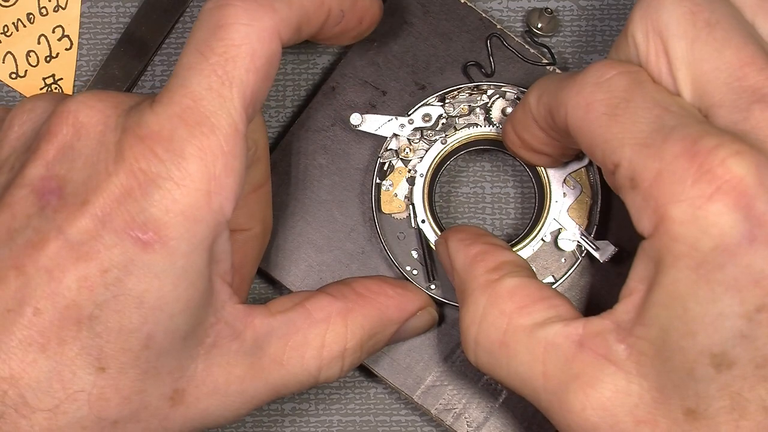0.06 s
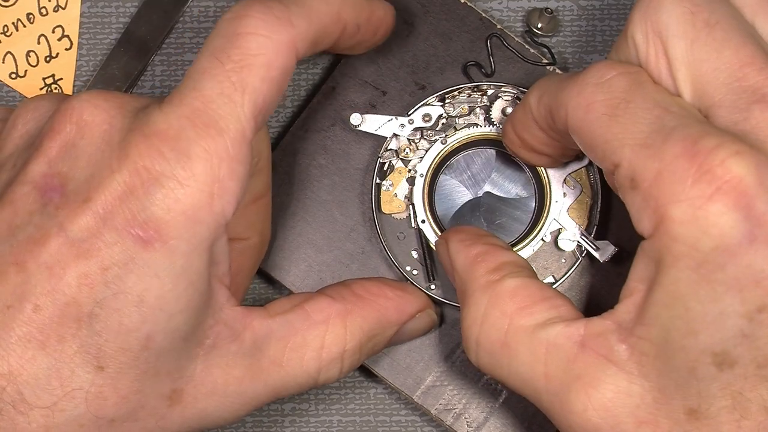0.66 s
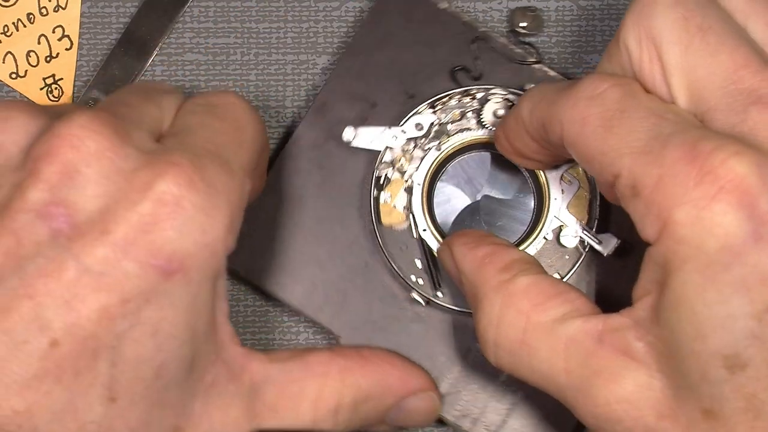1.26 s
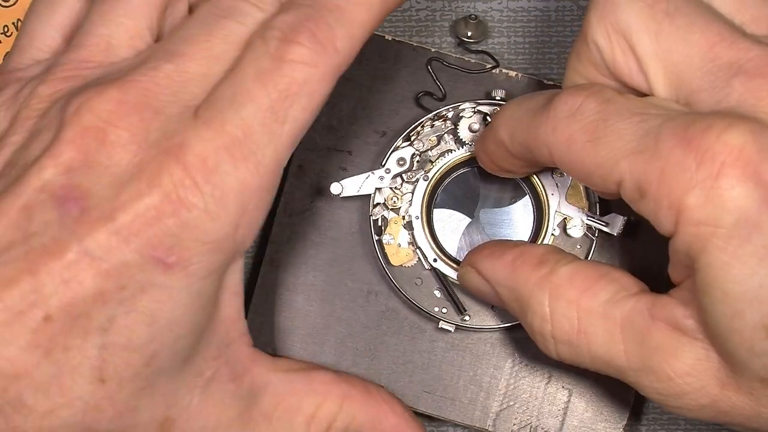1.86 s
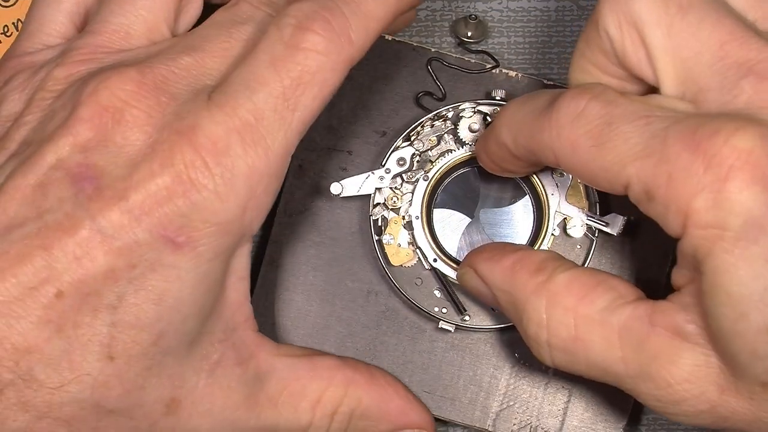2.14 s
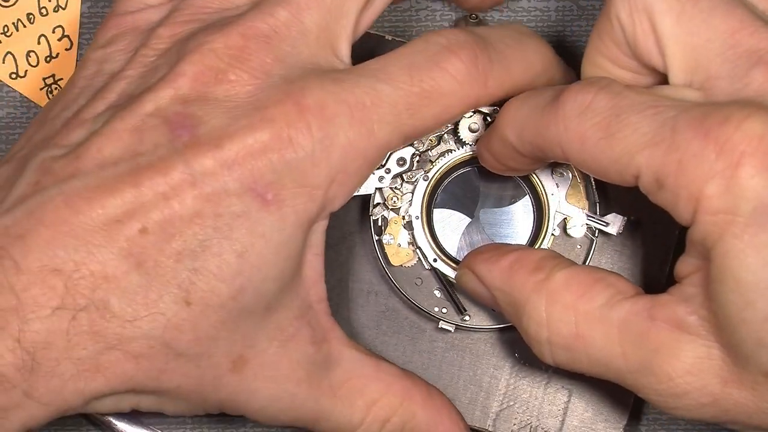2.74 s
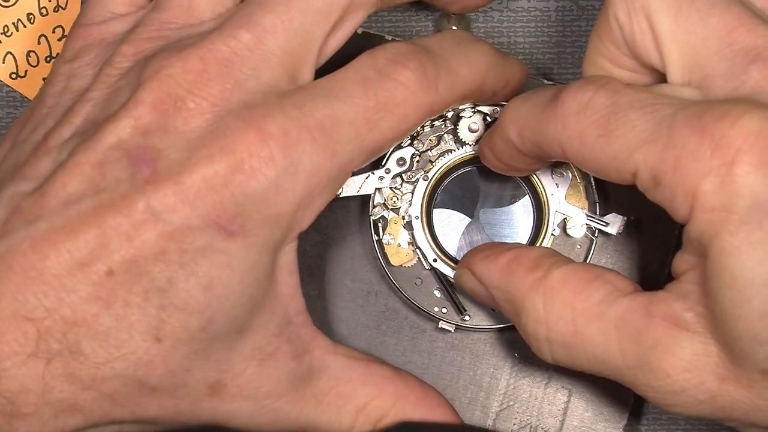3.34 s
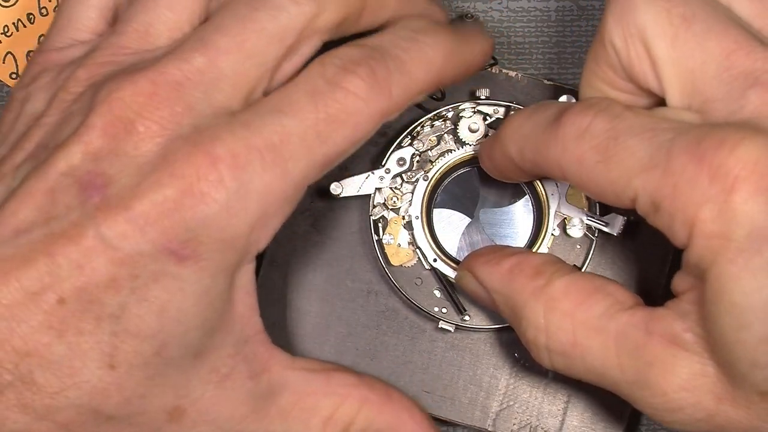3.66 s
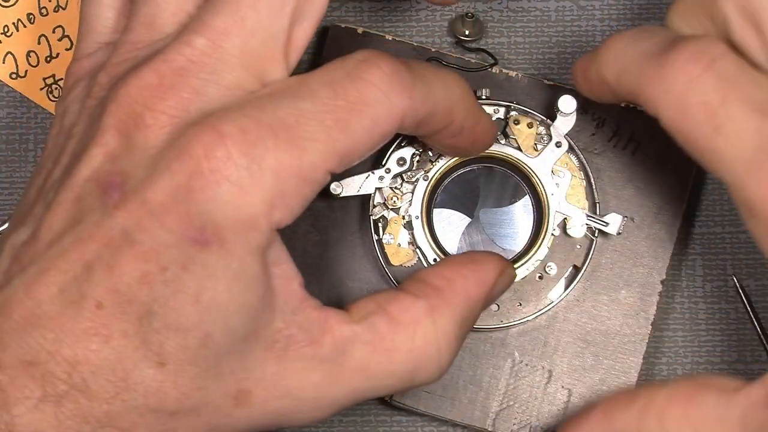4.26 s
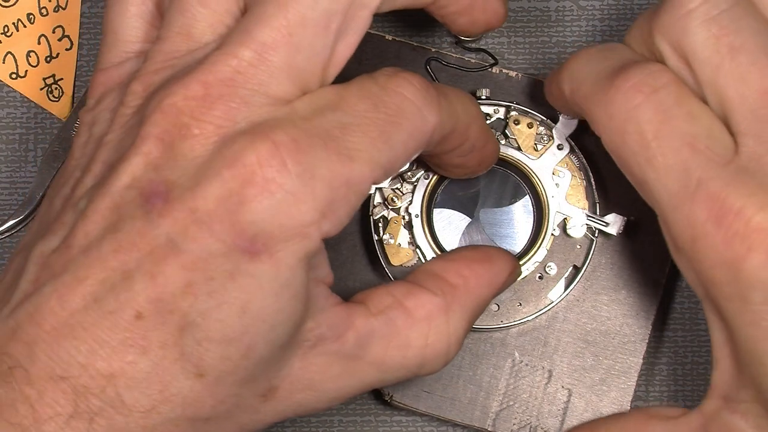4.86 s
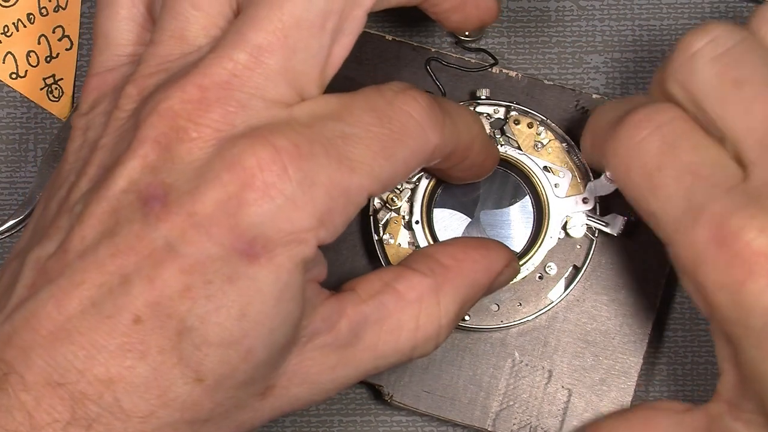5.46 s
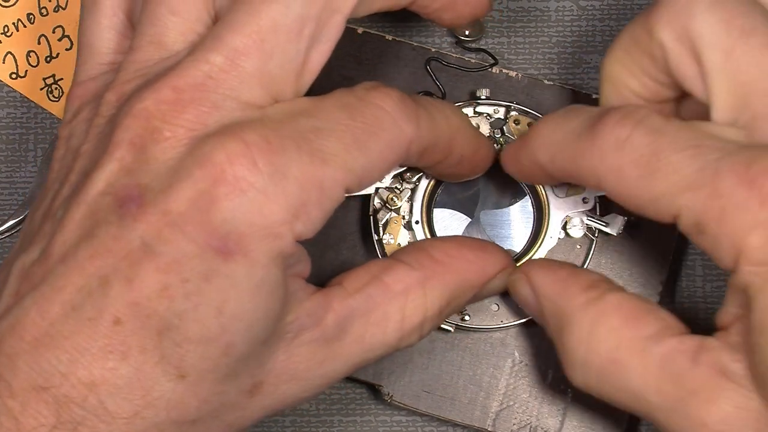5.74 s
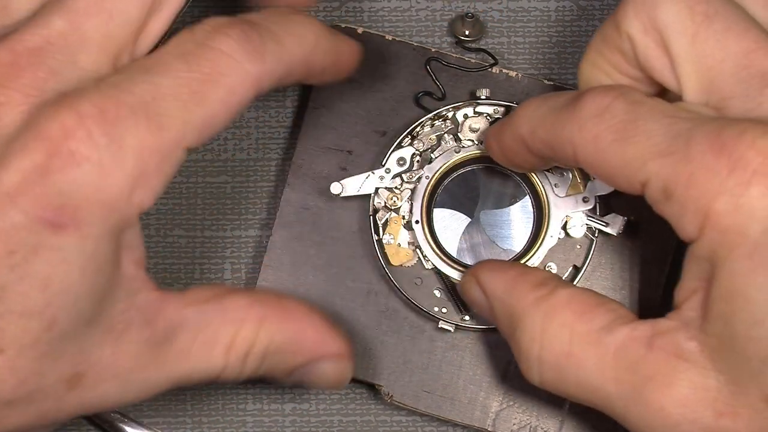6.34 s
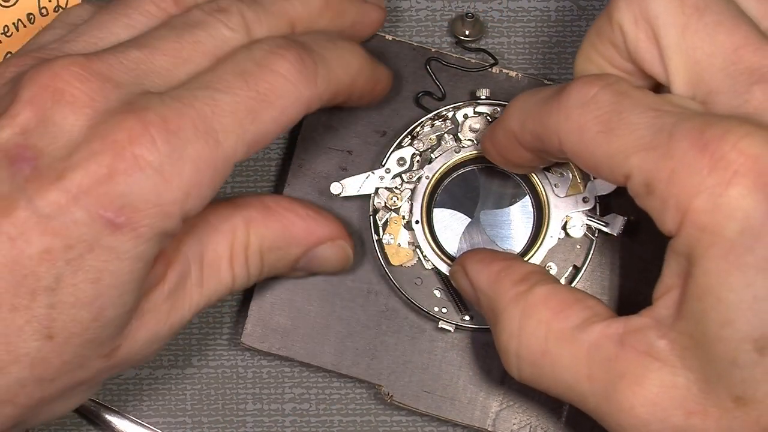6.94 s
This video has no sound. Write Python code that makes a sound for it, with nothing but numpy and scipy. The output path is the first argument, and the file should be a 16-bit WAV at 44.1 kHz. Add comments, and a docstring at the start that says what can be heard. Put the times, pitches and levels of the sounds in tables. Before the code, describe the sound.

A small camera shutter whirrs briefly and snaps shut, then faint metallic clicks and a quick ratcheting as it is cocked again.

```python
"""A leaf shutter, close up on a workbench: its clockwork escapement whirrs and the blades snap shut.
Later a lever clicks, a pawl ticks and the gears spin back as the spring is cocked again.
The blows jolt the base plate. Fingers rub the metal and slide the plate over the mat, with one squeak.
Underneath: a small quiet room, a humming fan and a faint electronic tick."""
import sys
import numpy as np
from scipy import signal
from scipy.fft import rfft, irfft
from scipy.io import wavfile
from scipy.ndimage import uniform_filter1d

SR = 44100
rng = np.random.default_rng(int(sys.argv[2]) if len(sys.argv) > 2 else 0)


def transcribe(signal):
    """Save signal, clipped to [-1, 1], as a 16-bit WAV file at the path in sys.argv[1]."""
    frames = np.atleast_2d(signal).T
    limited = np.clip(frames, -1, 1)
    pcm = np.round(limited * 32767).astype(np.int16)
    wavfile.write(sys.argv[1], SR, pcm)


N = 312669

# metal parts striking: start_s, level_db, hardness_db (more edge, less knock), t60_s, pitch_hz
BLOWS = [(0.2052, -23, 4, .0046, 6000), (.2078, -22.5, .5, 0.0063, 5923), (.209, -25, 2, 0.0023, 5166),
         (1.538, -67, -5, 0.027, 6370), (2.448, -54, -3, .008, 3660), (3.0333, -33, -3, .012, 2160),
         (4.796, -63, 4.5, .016, 5630), (4.809, -58, -6.5, 0.018, 5380), (4.9215, -61.5, 2, .018, 5480),
         (4.9505, -43, 2, .035, 5140), (5.0184, -42.5, 6, 0.022, 5460), (5.0656, -34.5, 8.5, .024, 5720),
         (5.0679, -40.5, -7.5, 0.0462, 5500), (5.1499, -50, 1, 0.024, 5480),
         (5.3427, -51, -0.5, 0.024, 1600), (5.412, -65.5, -8, 0.026, 1600), (5.434, -62.5, 0, 0.043, 5630),
         (5.9449, -47.5, -5.5, 0.016, 1134), (6.2968, -64, -13, 0.0133, 1760)]
# escapement speed: time_s, teeth_per_s
RUN_DOWN = [(0, 325), (.09, 325), (.14, 365), (.205, 430)]


def amp(db):
    return 10 ** (np.asarray(db) / 20)


def unit_rms(x):
    return x / np.sqrt(np.mean(x ** 2) + 1e-30)


def log_interp(points, hz):
    point_hz, value = np.transpose(points)
    return np.interp(np.log(hz + 1), np.log(point_hz + 1), value)


def during(rows):
    """True from the first to the last row of a timed table."""
    t = np.arange(N) / SR
    return (t >= rows[0][0]) & (t <= rows[-1][0])


def add(mix, start_s, sound):
    part = mix[max(round(start_s * SR), 0):][:len(sound)]
    part += sound[:len(part)]


def colour(x, spectrum, size=2048):
    """Minimum-phase filter of unit energy."""
    log_gain = np.log(amp(log_interp(spectrum, abs(np.fft.fftfreq(size, 1 / SR)))))
    taps = np.fft.ifft(np.exp(np.conj(signal.hilbert(log_gain)))).real[:size // 2]
    return signal.fftconvolve(x, taps / np.linalg.norm(taps))[:len(x)]


def ring(modes, size=16000):
    """Free decay of struck modes."""
    t = np.arange(size) / SR
    return sum(rng.choice([-1, 1]) * amp(db - 60 * t / t60_s) * np.sin(2 * np.pi * hz * t)
               for hz, db, t60_s in modes)


def drift(depth, size):
    """Smooth random factor around 1."""
    return 1 + depth * unit_rms(uniform_filter1d(rng.standard_normal(N), size))


def tone(hz, waver):
    """Unsteady sine, unit rms."""
    return np.sqrt(2) * np.sin(2 * np.pi * np.cumsum(hz * drift(waver, 60)) / SR)


def room(x, wet_db=-8, bass_db=4, gap_s=.00043, size=16384):
    """Adds dense small-room reflections, stronger and longer in the bass."""
    decay = [(200, .18), (1000, .17), (4000, .16), (8000, 0.14), (15000, .15)]  # freq_hz, t60_s
    taps = rng.choice([-1., 1.], size) * (rng.random(size) < .2)
    hz, t, bins = signal.stft(taps, SR, nperseg=256)
    tilt_db = log_interp([(1200, bass_db), (5000, 0)], hz)[:, None]
    bins = bins * amp(tilt_db - 60 * t / log_interp(decay, hz)[:, None])
    onset = 1 - np.exp(-(np.arange(size) / SR / gap_s) ** 2)
    tail = onset * signal.istft(bins, SR, nperseg=256)[1][:size]
    return x + amp(wet_db) * signal.fftconvolve(x, tail / np.linalg.norm(tail))[:N]


def fan_and_air(air_db=-67.5):
    """Air resonating in the fan housing, hum of fan and electronics, steady room noise."""
    resonances = [(149, 14, -87.5), (2245, 63, -76.5), (3680, 410, -84.5)]  # centre_hz, width_hz, level_db
    hum_tones = [(150.2, -80), (995.9, -88.5), (4953, -94), (5965, -88), (10896, -89.5)]  # pitch_hz, level_db
    air_spectrum = [(30, -27.5), (55, -0.5), (110, -5), (260, -1), (450, -4), (700, -7.5), (1300, -12.5),
                    (2100, -9.5), (3800, -14), (5500, -17.5), (8200, -29.5), (10200, -21), (14000, -17),
                    (16000, -24.5)]  # freq_hz, gain_db
    hz = np.fft.rfftfreq(N, 1 / SR)
    power = sum(amp(db) ** 2 * unit_rms(1 / (1 + 2 * ((hz - centre_hz) / width_hz) ** 2)) ** 2
                for centre_hz, width_hz, db in resonances)
    housing = irfft(rfft(rng.standard_normal(N)) * np.sqrt(power), N)
    clock_s = np.cumsum(drift(.00018, 4000)) / SR
    hum = sum(amp(db) * np.sqrt(2) * np.sin(2 * np.pi * pitch_hz * clock_s) for pitch_hz, db in hum_tones)
    return housing + hum + amp(air_db) * unit_rms(colour(rng.standard_normal(N), air_spectrum))


def electronic_tick(first_s=.041, rate_hz=25, pitch_hz=3980, width_s=.0019, rest_db=-73, uneven_db=1.9):
    """Soft regular pips, louder in spells, plus two stronger ones."""
    spells = [(0, 1.6, -68), (3.42, 3.6, -69), (6.45, 7.09, -68)]  # start_s, end_s, level_db
    strong_pips = [(1.7393, -53.5), (3.719, -53.5)]  # time_s, level_db
    t, out = np.arange(-256, 256) / SR, np.zeros(N)
    pip = np.exp(-(t / width_s) ** 2) * np.sin(2 * np.pi * pitch_hz * t)
    times_s = first_s + np.arange(int(N / SR * rate_hz)) / rate_hz
    in_spell = [(times_s > start_s) & (times_s < end_s) for start_s, end_s, _ in spells]
    levels_db = np.select(in_spell, [db for *_, db in spells], rest_db)
    levels_db = levels_db + uneven_db * rng.standard_normal(len(times_s))
    for time_s, db in [*zip(times_s, levels_db), *strong_pips]:
        add(out, time_s + t[0], amp(db) * pip)
    return out


def stroke(peak_s, length_s, peak_db, depth_db=14.5, rise_share=.457):
    """Gain of a hand stroke: swells, eases off, depth_db down at either end."""
    t = np.arange(N) / SR - peak_s
    return amp(peak_db - depth_db * np.maximum(-t / rise_share, t / (1 - rise_share)) / length_s)


def friction(strokes, spectrum, rest_db, slips_per_s, spread_db):
    """Tiny uneven slips under a hand that never quite rests."""
    sizes = amp(spread_db * np.minimum(rng.exponential(1, N), 4)) * rng.choice([-1, 1], N)
    slips = sizes * (rng.random(N) < slips_per_s / SR)
    motion = np.sqrt(amp(rest_db) ** 2 + sum(stroke(*row) ** 2 for row in strokes))
    return motion * unit_rms(colour(slips, spectrum))


def plate_slide():
    """Hands and base plate sliding on the mat."""
    strokes = [(1.26, 0.35, -68.5), (1.54, 0.13, -67.5), (2.03, .3, -61.5), (2.35, .45, -69.5),
               (3.37, 0.29, -68.5), (4.08, .3, -72), (5.0, 0.3, -61), (5.42, .16, -69), (6.21, 0.325, -69),
               (6.82, .4, -66), (7.05, 0.65, -66.5)]  # peak_s, length_s, level_db
    spectrum = [(60, -18), (200, -6), (320, 5), (480, -5.5), (1100, -12.5), (2200, -11.5), (3400, -16),
                (5000, -26.5), (16000, -43)]  # freq_hz, gain_db
    return friction(strokes, spectrum, rest_db=-81, slips_per_s=1600, spread_db=3)


def finger_rub():
    """Skin dragging on metal."""
    strokes = [(1.09, .1, -70), (1.26, 0.35, -68), (2.41, .2, -66), (2.455, 0.0563, -61), (3.94, .14, -70),
               (4.93, 0.17, -64), (6.21, 0.178, -73.5), (7.03, 0.49, -78)]  # peak_s, length_s, level_db
    spectrum = [(300, -8), (1200, -2), (3000, 2), (5600, 2.5), (7500, -8.5), (10500, -5), (13500, 2),
                (16000, -8)]  # freq_hz, gain_db
    return friction(strokes, spectrum, rest_db=-86.5, slips_per_s=3000, spread_db=3.5)


def plate_squeak(peak_s=6.965, length_s=.138, top_hz=11400, climb_hz_per_s=15000, sag_hz_per_s=5500):
    """Stick-slip under the plate: pitch climbs, then sags; loudest at the top."""
    t = np.clip(np.arange(N) / SR - peak_s, -length_s, length_s)
    hz = top_hz - np.maximum(-t * climb_hz_per_s, t * sag_hz_per_s)
    return stroke(peak_s, length_s, peak_db=-69.5) * tone(hz, waver=.008)


def plate_thuds(ref_blow_db=-36.5, t60_s=.045, span_s=.0095, band_ratio=2.2, size=8192):
    """The base plate knocks on the bench, kicked by the shutter or rocked by the hands."""
    knocks = [(.2095, -48.5, 1300), (5.07, -57, 910), (5.363, -61, 802), (6.21, -67, 697),
              (6.267, -58, 420), (6.297, -56.5, 170)]  # start_s, level_db, centre_hz
    bench_spectrum = [(50, -19.5), (110, -4), (160, -2), (240, -4), (330, 2), (470, -6), (620, -3.5),
                      (800, -9), (1050, -4), (1800, -7), (4000, -27.5), (16000, -59.5)]  # freq_hz, gain_db
    # stronger blows jolt louder and higher
    jolts = [(start_s, -60 + .37 * (db - ref_blow_db), 434 + 130 * amp(db - ref_blow_db))
             for start_s, db, *_ in BLOWS]
    t, out = np.arange(size) / SR, np.zeros(N)
    for start_s, db, hz in knocks + jolts:
        push = rng.standard_normal(size) * amp(-60 * t / t60_s)
        contact = signal.butter(2, (hz / band_ratio, hz * band_ratio), "band", fs=SR, output="sos")
        thud = colour(signal.sosfilt(contact, push), bench_spectrum)
        add(out, start_s, amp(db) * thud / np.linalg.norm(thud) * np.sqrt(span_s * SR))  # rms over span_s
    return out


def star_wheel(pitch_hz=620, start_db=-68, fade_db_per_s=35):
    """Fading hum of the star wheel while the escapement runs."""
    gain = during(RUN_DOWN) * amp(start_db - fade_db_per_s * np.arange(N) / SR)
    return gain * tone(pitch_hz, waver=.01)


def spring_shimmer(level_db=-41, t60_s=.29, count=120):
    """Spring coils ring after the strongest blow, the snap of the blades."""
    spectrum = [(2500, -9), (5200, -7), (5950, 10), (6700, -5), (8300, -12), (9700, -5), (13500, -1.5),
                (15500, -7.5)]  # freq_hz, mode_gain_db
    pitches_hz = rng.uniform(spectrum[0][0], spectrum[-1][0], count)
    gains_db = log_interp(spectrum, pitches_hz)
    shimmer = ring([(hz, db, t60_s) for hz, db in zip(pitches_hz, gains_db)], size=12000)
    snap_s = max(BLOWS, key=lambda row: row[1])[0]
    out = np.zeros(N)
    add(out, snap_s, amp(level_db) * shimmer * np.sqrt(2) / np.linalg.norm(amp(gains_db)))
    return out


def gears(speed, level_db, contact_s, uneven_db, rock, ring_db):
    """Teeth scrape a rocking pallet, alternately duller and brighter, and ring the gear train."""
    tooth_spectrum = [(200, -31.5), (650, -22.5), (950, -18), (1500, -20.5), (1900, -22), (2200, -14),
                      (2600, -19), (3100, -16.5), (3900, -8.5), (5100, -10.5), (6050, 1.5), (6800, -5),
                      (7600, -8.5), (9000, -10), (10200, -3), (14300, 1.5), (16000, -9)]  # freq_hz, gain_db
    train_modes = [(970, -15, .036), (1690, -12, .045), (2075, -5.5, .065), (2190, -6, .055),
                   (3520, -1, .02), (4090, 0, .016), (5510, 1, .018), (5970, 9, .014), (10150, 0, .01),
                   (14200, 6, .007)]  # pitch_hz, gain_db, t60_s
    ref_teeth_per_s, db_per_doubling = 400, 8
    jitter_s, split_hz = .0001943, 8300
    teeth_per_s = np.interp(np.arange(N) / SR, *np.transpose(speed))
    running, t = during(speed), np.arange(400) / SR
    teeth_passed = np.ceil(np.cumsum(teeth_per_s * running) / SR)
    times_s = np.flatnonzero(np.diff(teeth_passed, prepend=0)) / SR
    scrape = (t / contact_s) ** 2 * np.exp(-t / contact_s)
    faces = np.zeros((2, N))
    for k, time_s in enumerate(times_s):
        late, *force = rng.standard_normal(3)
        tooth = rng.choice([-1., 1.], len(t)) * scrape
        for side in range(2):
            gain = amp(uneven_db * force[side]) * (1 + rock * (-1) ** (k + side))
            add(faces[side], time_s + jitter_s * late, gain * tooth)
    drive = sum(signal.sosfilt(signal.butter(3, split_hz, kind, fs=SR, output="sos"), face)
                for kind, face in zip(("low", "high"), faces))
    response = ring(train_modes)
    ringing = signal.fftconvolve(drive, response / np.linalg.norm(response))[:N]
    whirr = colour(drive, tooth_spectrum) + amp(ring_db) * ringing
    speed_db = db_per_doubling * np.log2(teeth_per_s / ref_teeth_per_s)
    return amp(level_db + speed_db) * whirr / np.std(whirr[running])


def cocking_gears():
    """The cocking lever spins the gears back."""
    speed = [(4.955, 247), (4.996, 380), (5.004, 880), (5.06, 596), (5.12, 470), (5.145, 140)]  # time_s, teeth_per_s
    return gears(speed, level_db=-51, contact_s=.0003, uneven_db=1.5, rock=.09, ring_db=-8)


def pawl_blows(start_s=4.8832, stop_s=4.995, gap_s=.0131, start_db=-69, rise_db_per_s=143, uneven_db=1.5):
    """Pawl ticks, growing as the spring tightens; rows as in BLOWS."""
    hardness_db, t60_s, pitch_hz = 0, .012, 5443
    times_s = np.arange(start_s, stop_s, gap_s)
    ramp_db = start_db + rise_db_per_s * (times_s - start_s)
    levels_db = ramp_db + uneven_db * rng.standard_normal(len(times_s))
    return [(time_s, db, hardness_db, t60_s, pitch_hz) for time_s, db in zip(times_s, levels_db)]


def escapement():
    """The clockwork runs down, speeding up until the snap."""
    return gears(RUN_DOWN, level_db=-39, contact_s=.00042, uneven_db=1.4, rock=.25, ring_db=-7)


def shutter_clicks(blows, rise_s=.00057, span_s=.005, size=4096):
    """Contact chatter: case knock, lever clack, bright blade edge and ring of the struck part."""
    spectrum = [(150, -38), (400, -21.5), (700, -13), (1100, -6), (1700, -2.5), (2130, -1.5), (2750, -11.5),
                (3550, -2.5), (4300, -5.5), (5150, 0.5), (5900, 5), (7000, -8.5), (8800, -11),
                (11000, -3.5), (13500, 2.5), (16000, -7)]  # freq_hz, gain_db
    lever_modes = [(.88, -4.5, .007), (1, 3, .013), (1.15, -5.5, .008), (1.631, -.5, .011),
                   (2.35, -3.5, .008)]  # steel in bending: pitch_ratio, gain_db, t60_s
    knock_db, clack_db, edge_db, ring_db = -10.5, 0, 1, -4.5
    bands = [signal.butter(3, edges_hz, kind, fs=SR, output="sos")
             for edges_hz, kind in ((2600, "low"), ((2600, 8300), "band"), (8300, "high"))]
    t, out = np.arange(size) / SR, np.zeros(N)
    onset = 1 - np.exp(-(t / rise_s) ** 2)
    for start_s, level_db, hardness_db, t60_s, pitch_hz in blows:
        chatter = colour(rng.choice([-1., 1.], size) * onset * amp(-60 * t / t60_s), spectrum)
        modes = [(pitch_hz * ratio, db, decay_s) for ratio, db, decay_s in lever_modes]
        parts = [signal.sosfilt(band, chatter) for band in bands] + [onset * ring(modes, size)]
        shares_db = (knock_db - hardness_db, clack_db, edge_db + hardness_db, ring_db)
        for part, share_db in zip(parts, shares_db):
            scale = np.sqrt(span_s * SR) / np.linalg.norm(part)  # unit rms over span_s
            add(out, start_s, amp(level_db + share_db) * scale * part)
    return out


def scene():
    """Blows, hands and gears with room reflections; faint sources dry."""
    blows = shutter_clicks(BLOWS + pawl_blows()) + plate_thuds()
    hands = plate_slide() + finger_rub()
    faint = spring_shimmer() + star_wheel() + plate_squeak() + electronic_tick() + fan_and_air()
    clockwork = escapement() + cocking_gears()
    return (room(blows + hands + clockwork) + faint)[None]


def record(dry):
    """Microphone: one deep treble dip, then the band limit."""
    dip_hz, width_hz, depth, cutoff_hz = 8270, 1100, .88, 15900
    notched = signal.lfilter(*signal.iirnotch(dip_hz, dip_hz / width_hz, SR), dry)
    dipped = dry + depth * (notched - dry)
    lowpass = signal.firwin(511, cutoff_hz, window=("kaiser", 9), fs=SR)
    return signal.oaconvolve(dipped, lowpass[None], "same")


dry = scene()
out = record(dry)
transcribe(out)
```